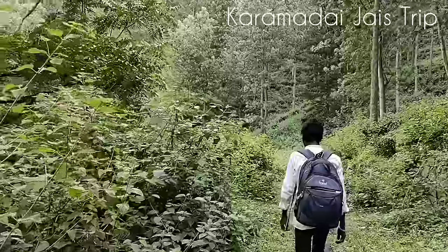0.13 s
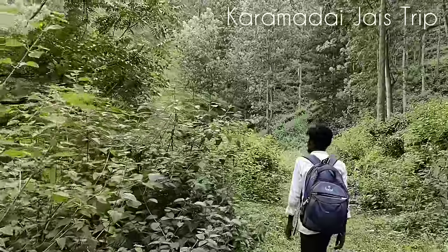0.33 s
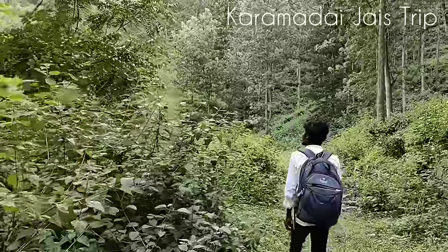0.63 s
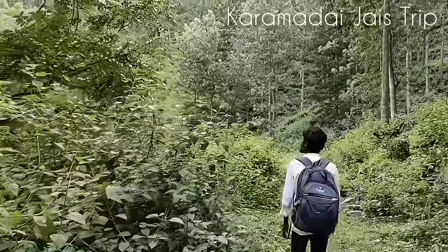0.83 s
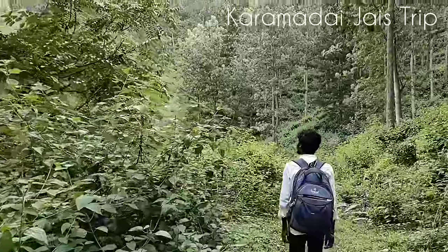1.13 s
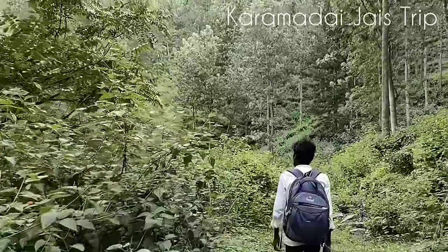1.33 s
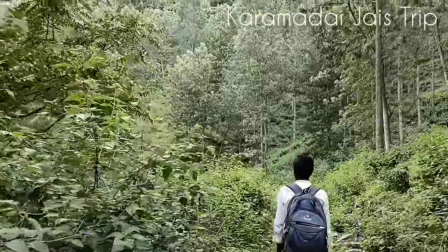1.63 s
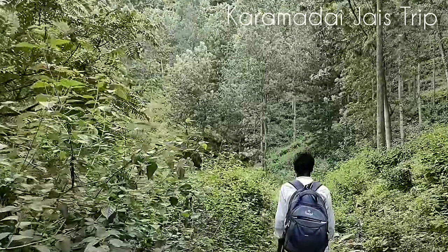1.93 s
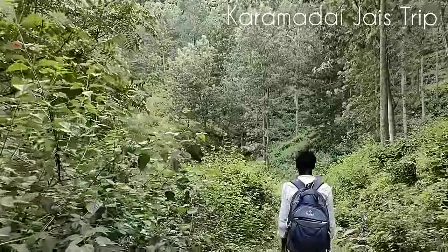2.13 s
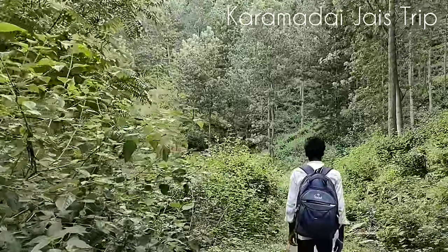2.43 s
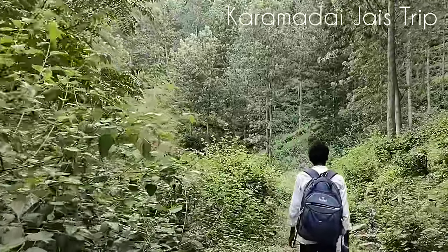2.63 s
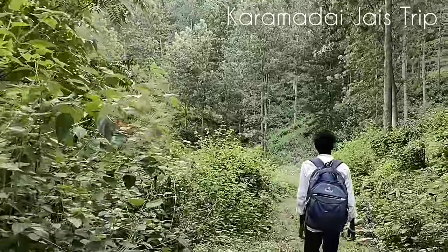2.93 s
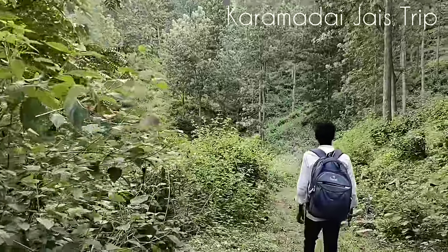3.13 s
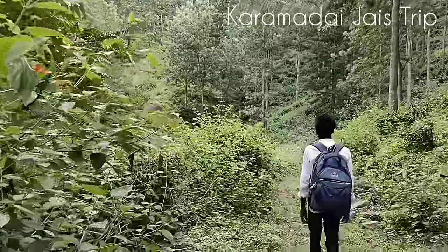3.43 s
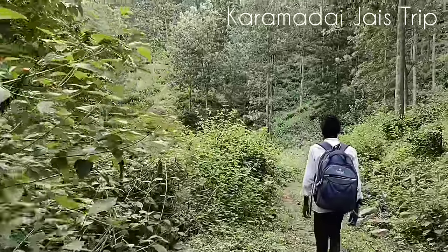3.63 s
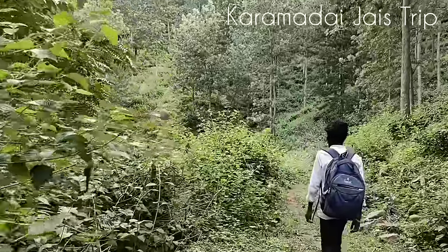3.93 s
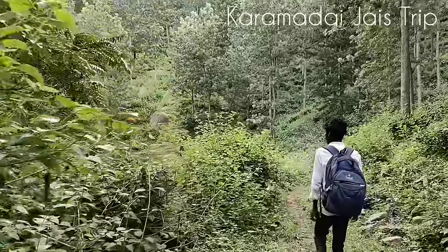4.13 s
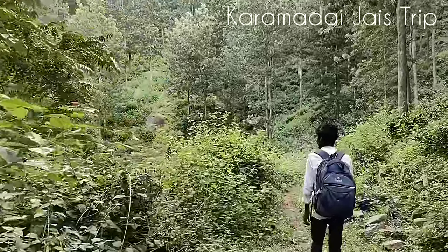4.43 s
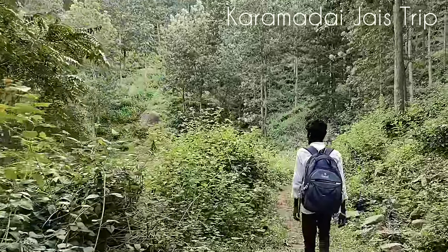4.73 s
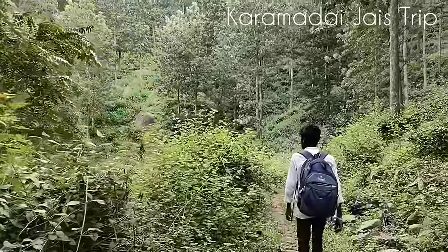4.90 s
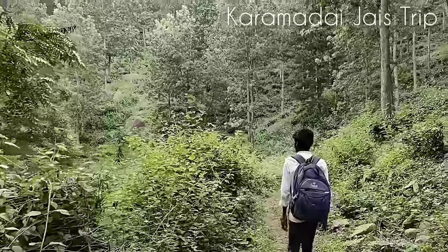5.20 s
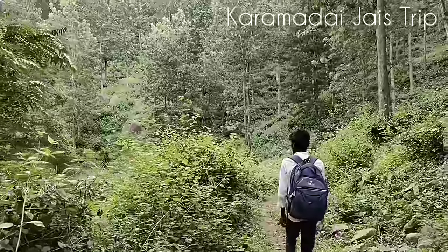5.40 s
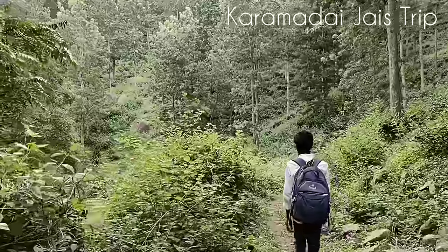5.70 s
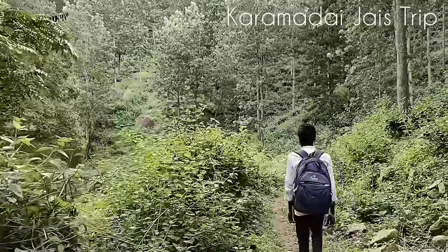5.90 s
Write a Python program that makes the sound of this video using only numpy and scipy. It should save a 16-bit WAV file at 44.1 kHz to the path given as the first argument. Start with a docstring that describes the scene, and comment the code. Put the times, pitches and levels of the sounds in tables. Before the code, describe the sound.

Close, uneven steps crackle over twigs and leaves with dull thuds, while soft wind buffets the microphone and small birds chirp behind.

```python
"""A dirt trail in dense forest, walked with a hand-held microphone.
Each footfall is a twig's sharp pulse and a burst of tiny litter breaks through resonances, over a damped thud.
Low-passed eddies buffet the microphone; birds are gliding, warbling sines with a scattered tail.
An unsteady sine gives an insect's thin tones and one step's ringing; coloured noise makes the far hush.
A narrow-band recorder suppresses weak bands, cuts the treble and adds hiss."""
import sys
import numpy as np
from scipy import signal
from scipy.fft import rfft, irfft
from scipy.io import wavfile
from scipy.ndimage import uniform_filter1d, map_coordinates

SR = 44100
rng = np.random.default_rng(int(sys.argv[2]) if len(sys.argv) > 2 else 0)


def log_audio(samples):
    """Write samples as a 16-bit WAV file to the path given in sys.argv[1]."""
    # one column per channel
    frames = np.atleast_2d(samples).T
    # limit to full scale, then quantise
    limited = np.clip(frames, -1, 1)
    pcm = np.round(limited * 32767).astype(np.int16)
    wavfile.write(sys.argv[1], SR, pcm)


N = 267157
TIME = np.arange(N) / SR

# Bands of knock, wood, twig and crack. Each row: low edge in Hz, high edge in Hz.
REGISTERS = [(160, 900), (1000, 2200), (2250, 3400), (3600, 7200)]
# Footfalls. Each row: start in seconds, own pitch in Hz, snap in dB, crunch in dB,
# crunch length in seconds, brightness in dB, fullness in dB, thud in dB.
FOOTFALLS = [(.754, 1860, -35, -51.5, 0.064, -4.5, 1.5, -60),
             (1.906, 5680, -26.5, -47, 0.047, 0.5, -3.5, -23.5),
             (2.483, 1583, -30.5, -46, 0.063, -0.5, -0.5, -34.5),
             (3.0381, 1526, -24, -49.5, 0.051, -2, 1.5, -15),
             (3.3038, 5250, -44.5, -55.5, 0.025, -1, -9.5, -56.5),
             (3.6284, 3870, -32.5, -59, 0.084, 7, -6, -24.5),
             (4.171, 6120, -30.5, -47, 0.024, 5, -9, -23.5), (4.222, 5640, -36, -51, 0.12, 2.5, -16.5, -26),
             (4.262, 1890, -39.5, -60.5, 0.012, -5.5, -10, -41.5),
             (4.8615, 1210, -43.5, -54, 0.034, -3.5, 2, -46.5),
             (5.309, 3900, -38, -56, 0.092, 0.5, -11.5, -33.5), (6.0186, 5040, -42, -50, .028, 0, -32, -45)]


def from_db(db):
    """Logarithmic level: decibels to amplitude gain."""
    return 10 ** (np.asarray(db) / 20)


def rms_one(x):
    """Normalisation by mean power: scale to rms 1."""
    return x / np.sqrt(np.mean(x ** 2) + 1e-20)


def level(rows):
    """Level envelope, linear in dB: gain at every sample from (seconds, dB) rows."""
    return from_db(np.interp(TIME, *np.transpose(rows)))


def add(out, s, sound):
    """Superposition: mix a sound in at a time in seconds."""
    start = max(round(s * SR), 0)
    out[start:start + len(sound)] += sound[:max(N - start, 0)]


def drift(rate_hz, size):
    """Band-limited fluctuation: random points joined smoothly, rms 1."""
    place = np.arange(size) * rate_hz / SR
    return rms_one(map_coordinates(rng.standard_normal(4096), [place], order=3, mode="wrap"))


def coloured_noise(spectrum):
    """Spectral shaping: white noise weighted by (Hz, dB) rows, rms 1."""
    hz, db = np.transpose(spectrum)
    bins = np.maximum(np.arange(N // 2 + 1) * SR / N, 1)
    gain = from_db(np.interp(np.log(bins), np.log(hz), db, left=-120, right=-120))
    return rms_one(irfft(rfft(rng.standard_normal(N)) * gain, N))


def resonance(x, hz, width_hz):
    """Damped resonator: a conjugate pole pair with gain near 1 at its peak."""
    r = np.exp(-np.pi * width_hz / SR)
    numerator = np.array([1, 0, -1]) * (1 - r * r) / 2
    return signal.lfilter(numerator, [1, -2 * r * np.cos(2 * np.pi * hz / SR), r * r], x)


def swell(s, length, attack_s, t60_s):
    """Envelope: rise to full strength at a time, hold, decay exponentially."""
    rise = np.clip(1 + (TIME - s) / attack_s, 0, 1) ** 2
    return rise * from_db(-60 * np.clip((TIME - s - length) / t60_s, 0, 3))


def forest_hush():
    """Diffuse background: coloured noise for the far forest, let through by the recorder's noise gate."""
    # Level of the hush as the recorder's noise gate opens and closes.
    # Each row: time in seconds, level in dB.
    hush = [(0, -100), (.15, -79), (.9, -76.5), (1.1, -90), (1.35, -79), (2.1, -71.5), (2.9, -70),
            (3.4, -83), (4.8, -78), (5.05, -100), (5.28, -100), (5.36, -70), (6.06, -70)]
    # Its spectrum. Each row: frequency in Hz, relative density in dB per Hz.
    hush_colour = [(200, -9), (500, -2.5), (1200, -0.5), (2200, -5.5), (3200, -1.5), (5500, -6),
                   (7200, -11.5)]
    return level(hush) * coloured_noise(hush_colour)


def air_strength():
    """Addition of powers: short puffs join a flow that comes and goes."""
    # Rising and dropping flow over the microphone. Each row: time in seconds, level in dB.
    flow = [(0, -84), (.1, -88), (.15, -37.5), (.6, -61.5), (.85, -57), (1.22, -86), (1.38, -35),
            (1.66, -59), (2.1, -35.5), (2.75, -29), (3.3, -42.5), (3.41, -81), (3.66, -31), (3.97, -82),
            (4.6, -73), (5.28, -89.5), (5.36, -62.5), (6.06, -64)]
    # Puffs. Each row: time of full strength in seconds, hold in seconds, level in dB.
    gusts = [(0.159, 0.015, -30.5), (0.23, 0.031, -34.5), (0.441, 0.0057, -30), (1.473, 0.018, -20.5),
             (1.751, 0.0059, -27.5), (1.828, 0.0063, -28), (2.089, .006, -24), (2.178, 0.037, -25.5),
             (2.267, 0.028, -21), (2.475, 0.084, -18.5), (2.692, 0.045, -15), (2.808, 0.092, -19.5),
             (3.031, 0.026, -28.5), (3.698, 0.035, -30), (5.447, 0.0055, -41.5), (5.784, 0.0076, -48.5),
             (5.874, 0.0064, -49.5), (5.952, 0.02, -44)]
    attack_s, t60_s = 0.039, .18
    puffs = sum((from_db(db) * swell(s, length, attack_s, t60_s)) ** 2 for s, length, db in gusts)
    return np.sqrt(level(flow) ** 2 + puffs)


def buffeting(calm_hz, gale_hz):
    """Turbulence at the port: stronger air carries the eddies to higher frequencies."""
    # Eddies before the low-pass. Each row: frequency in Hz, relative density in dB per Hz.
    buffet_colour = [(12, -11), (22, 3.5), (32, 7.5), (52, 2.5), (85, 1), (160, -14), (260, -24.5),
                     (420, -34)]
    eddies = coloured_noise(buffet_colour)
    strength = air_strength()
    # position among four cutoffs, from light air (0) to a gale (3)
    gust = np.interp(20 * np.log10(strength), [-55, -14], [0, 3])
    air = 0
    for k, hz in enumerate(np.geomspace(calm_hz, gale_hz, num=4)):
        softened = signal.sosfilt(signal.butter(5, hz, fs=SR, output="sos"), eddies)
        air = air + np.maximum(1 - abs(gust - k), 0) * softened
    # the air strength alone sets the level, so the eddies are evened out
    power = uniform_filter1d(uniform_filter1d(air ** 2, size=1400), size=900)
    return strength * air / np.sqrt(power + 1e-9)


def bird_notes():
    """Glides and an echo: yields (start s, length s, three pitches Hz, dB, warble %) of each note."""
    # Rough chirps. Each row: start in seconds, length in seconds, start pitch in Hz, glide in %, level in dB.
    chirps = [(.084, 0.025, 4290, -11, -52), (.196, 0.048, 3480, -6.5, -54), (1.51, 0.24, 6690, -3.5, -67),
              (1.618, 0.043, 6160, -30.5, -44), (1.656, 0.092, 5345, -11, -56),
              (1.758, 0.053, 6014, -8.5, -37.5), (1.816, 0.029, 4383, -6.5, -44.5),
              (3.53, 0.041, 3092, 1, -66), (3.575, 0.065, 3888, -1.5, -50.5),
              (3.876, 0.022, 2965, -10.5, -47), (4.029, 0.066, 3527, -4.5, -53.5),
              (4.066, 0.0084, 1343, 4.5, -43.5), (4.118, 0.014, 6850, -14.5, -45),
              (4.384, 0.057, 6030, -7.5, -43.5), (4.385, 0.057, 2526, -8.5, -63),
              (4.439, 0.016, 4156, -2, -50), (4.524, 0.1, 3792, -5.5, -49.5),
              (4.652, 0.031, 3653, -3, -43.5), (4.715, 0.062, 3630, -2, -54.5), (5.594, 0.1, 4036, 6, -54),
              (5.623, 0.052, 3028, -2.5, -48), (5.685, 0.063, 3010, -3.5, -52.5),
              (5.736, 0.084, 4196, 1, -55), (5.752, 0.12, 2581, -11, -58.5)]
    # Soft, low hoots. Each row: start in seconds, length in seconds, start pitch in Hz, glide in %, level in dB.
    hoots = [(.21, 0.085, 915, -7.5, -60), (.374, 0.035, 873, -8.5, -48), (.473, 0.038, 871, 9.5, -47.5),
             (.66, 0.019, 1445, -2, -52), (5.41, .06, 927.5, 0, -60.5), (5.532, 0.14, 911, 2, -62)]
    # Clear whistles. Each row: start in seconds, length in seconds, reference pitch in Hz, level in dB.
    whistles = [(2.778, 0.11, 2821, -37), (4.696, 0.066, 2916, -40.5)]
    # Pitch at start, middle and end, as shares of the reference pitch.
    whistle_rise = np.array([0.96, .99, 0.97])
    chirp_warble, hoot_warble, whistle_warble = 2.8, 0.24, 0.94  # rms, %
    glide_shares = np.array([0, 0.54, 1])  # share of the glide done at start, middle and end
    for calls, warble in ((chirps, chirp_warble), (hoots, hoot_warble)):
        for s, length, hz, glide, db in calls:
            yield s, length, hz * (1 + glide / 100 * glide_shares), db, warble
    # a softer, rough upbeat leads into each whistle
    lead_s, lead_db, lead_rise = .06, -13, np.array([.835, .84, .91])
    echo_s, echo_db = 0.18, -34  # the hillside returns each whistle
    for s, length, hz, db in whistles:
        yield s - lead_s, lead_s, hz * lead_rise, db + lead_db, chirp_warble
        yield s, length, hz * whistle_rise, db, whistle_warble
        yield s + echo_s, length, hz * whistle_rise, db + echo_db, whistle_warble


def forest_scatter(x, size=13230):
    """Multiple scattering: trunks and leaves spread a sound into a short, diffuse tail."""
    t60_s, build_up_s = .22, 0.0051
    t = np.arange(size) / SR
    tail = rng.standard_normal(size) * from_db(-60 * t / t60_s) * np.minimum(t / build_up_s, 1)
    return signal.fftconvolve(x, tail / np.sqrt(np.sum(tail ** 2)))[:N]


def birds(direct_db, scattered_db, warble_hz, release_s, flutter_db):
    """Frequency modulation: sines start crisply, glide through three pitches with a quick warble and fade."""
    attack_s = 0.012
    out = np.zeros(N)
    for s, length, pitches, db, warble in bird_notes():
        t = np.arange(int((length + release_s / 2) * SR)) / SR
        hz = np.interp(t, [0, length / 2, length], pitches)
        hz = hz * (1 + warble / 100 * drift(warble_hz, len(t)))
        ramp = np.clip(np.minimum(t / attack_s, (t[-1] - t) / release_s), 0, 1)
        gain = np.sin(np.pi / 2 * ramp) ** 2 * from_db(db + flutter_db * drift(43, len(t)))
        tone = np.sqrt(2) * np.sin(2 * np.pi * np.cumsum(hz) / SR)
        add(out, s - attack_s / 2, gain * tone)
    return from_db(direct_db) * out + from_db(scattered_db) * forest_scatter(out)


def insect_and_ringing(flutter_db=2.0):
    """Amplitude modulation: one unsteady sine serves a distant insect and the ringing of a step."""
    # Thin tones near 4310 Hz: the insect, and at 2.488 the ringing of a step.
    # Each row: time of full strength in seconds, length before the release in seconds,
    # level in dB, fade over that length in dB (negative grows).
    thin_tones = [(0.132, 0.44, -67, 5), (.81, 0.092, -63, 11.5), (1.332, 1, -77.5, -4.5),
                  (2.488, 0.37, -57.5, 12.5), (5.37, 0.81, -72.5, -7)]
    attack_s, t60_s = .04, 0.058
    hz = 4310 + 7 * drift(90, N)
    strength = 0
    for s, length, db, fade_db in thin_tones:
        fade = from_db(db - fade_db * np.clip((TIME - s) / length, 0, 1))
        strength = strength + swell(s, length, attack_s, t60_s) * fade
    tone = np.sqrt(2) * np.sin(2 * np.pi * np.cumsum(hz) / SR)
    return strength * from_db(flutter_db * drift(57, N)) * tone


def trail_ring(register, own_hz, detune, own_db, own_q=7.0, size=2048):
    """Modal response of one register to a single break, unit energy; the broken piece adds its own pitch."""
    # Modes of the trail. Each row: frequency in Hz, width in Hz, relative level in dB.
    trail_modes = [(181.5, 40, -3), (343, 60, 2.5), (495, 82, 5.5), (637, 270, -1.5), (1194, 82, 7),
                   (1650, 200, -2), (1910, 250, -0.5), (2336, 66, -0.5), (2550, 2000, -1), (4130, 1000, 4),
                   (5950, 790, 0.5), (6490, 600, -4)]
    low, high = register
    click, out = signal.unit_impulse(size), np.zeros(size)
    for k, (hz, width_hz, db) in enumerate(trail_modes):
        shift, strength = rng.standard_normal(2)
        if low < hz < high:
            mode = resonance(click, hz * (1 + detune * shift), width_hz)
            out += (-1) ** k * from_db(db + 2.2 * strength) * mode
    if low < own_hz < high:
        out = out + from_db(own_db) * resonance(out, own_hz, own_hz / own_q)
    out = signal.sosfilt(signal.butter(3, register, "band", fs=SR, output="sos"), out)
    return out / np.sqrt(np.sum(out ** 2) + 1e-20)


def step_levels(brightness, fullness):
    """Spectral balance in dB per register: brightness tilts; fullness raises or lowers the middle."""
    # Make-up in knock, wood, twig and crack. Each row: snap in dB, crunch in dB,
    # share of brightness, share of fullness.
    step_colour = [(-1.5, -1.5, 0.23, 0), (-4, 2, 0.96, 0.71), (-16, -7.5, .3, 1), (-4.5, 1, 0.9, 0.028)]
    snap, crunch, bright_share, full_share = np.transpose(step_colour)
    colour = brightness * bright_share + fullness * full_share
    return snap + colour, crunch + colour


def litter():
    """Band excitation: yields (start s, length s, own Hz, dB per register, brushed) of each crush."""
    # Soil scuffed (low) or leaves brushed (high).
    # Each row: start in seconds, length in seconds, own pitch in Hz, level in dB.
    brushes = [(0.429, 0.026, 547, -54.5), (.76, 0.052, 1750, -48), (.762, 0.044, 586, -44.5),
               (0.878, 0.024, 532, -60), (1.255, 0.017, 2690, -47.5), (1.253, 0.13, 1445, -60),
               (1.292, 0.073, 2960, -53.5), (1.343, 0.018, 2054, -51.5), (1.368, 0.074, 1994, -64),
               (1.35, 0.039, 3710, -62), (2.371, 0.019, 2730, -60.5), (2.389, 0.099, 1575, -66),
               (3.689, 0.069, 480, -52), (4.235, 0.007, 400, -59), (4.254, 0.0073, 587, -48),
               (4.282, 0.068, 337, -63.5), (4.763, .02, 1550, -54.5), (5.36, 0.0096, 428, -42.5),
               (5.372, 0.0087, 514, -57.5), (5.387, 0.13, 324, -56), (5.379, 0.11, 6150, -60.5),
               (5.763, 0.052, 2900, -46.5), (5.961, 0.028, 4900, -46.5)]
    fall_db_per_octave = 25.5  # away from a brush's own pitch
    for s, hz, _, db, length, brightness, fullness, _ in FOOTFALLS:
        yield s, length, hz, db + step_levels(brightness, fullness)[1], False
    for s, length, hz, db in brushes:
        octaves = abs(np.log2(np.sqrt(np.prod(REGISTERS, axis=1)) / hz))
        yield s, length, hz, db - fall_db_per_octave * (octaves - octaves.min()), True


def crunches(grains_per_s, spread_db, tail_t60_s, step_ring_db, brush_ring_db, clump_db=-1.0, size=11025):
    """Granular fracture: leaves and grit give way in uneven clumps of tiny breaks, then settle."""
    typical_crush_s, settle_growth = 0.061, 0.52  # a longer crush takes longer to settle
    press_share, hold_share = 0.17, 0.41  # shares of a crush before full pressure and before decay
    out, t = np.zeros(N), np.arange(size) / SR
    for s, length, own_hz, levels, brushed in litter():
        settle_t60_s = tail_t60_s * (length / typical_crush_s) ** settle_growth
        press = np.minimum(t / (press_share * length), 1)
        pressure = press * from_db(-60 * np.maximum(t - hold_share * length, 0) / settle_t60_s)
        grain_db = spread_db * np.minimum(rng.exponential(1, size), 4) + clump_db * drift(160, size)
        breaks = rng.choice([-1, 1], size) * (rng.random(size) < grains_per_s / SR)
        grains = pressure * rms_one(from_db(grain_db) * breaks)
        own_db = brush_ring_db if brushed else step_ring_db
        for register, db in zip(REGISTERS, levels):
            ring = trail_ring(register, own_hz, detune=0.041, own_db=own_db)
            add(out, s, from_db(db) * signal.fftconvolve(grains, ring))
    return out


def thuds(soft_hz, size=8820):
    """Damped oscillation: each footfall or jolt sets off a low swing."""
    # Bumps against the microphone. Each row: start in seconds, level in dB, pitch in Hz, t60 in seconds.
    jolts = [(.686, -21.5, 161.5, .018), (.689, -16, 44.6, .05), (2.686, -27, 140, .07),
             (2.737, -19, 168.7, .08)]
    # steps with a stronger snap swing lower; this pitch belongs to this snap level
    thud_hz, at_snap_db, db_per_octave, thud_t60_s = 108, -34.5, 21.5, 0.084
    swings = []
    for s, _, snap_db, *_, db in FOOTFALLS:
        hz = thud_hz * 2 ** ((at_snap_db - snap_db) / db_per_octave)
        swings.append((s, db, hz, thud_t60_s))
    out, t = np.zeros(N), np.arange(size) / SR
    for s, db, hz, t60 in swings + list(jolts):
        add(out, s, from_db(db - 60 * t / t60) * np.sin(2 * np.pi * hz * t))
    return signal.sosfilt(signal.butter(4, soft_hz, fs=SR, output="sos"), out + 1e-18)


def snaps(splinter_db, splinter_s, size=441):
    """Impulsive excitation: a twig breaks in one sharp pulse, its last fibres tear just after."""
    out, t = np.zeros(N), np.arange(size) / SR
    for s, own_hz, snap_db, _, _, brightness, fullness, _ in FOOTFALLS:
        force = from_db(splinter_db) * rng.standard_normal(size) * np.exp(-t / splinter_s)
        force[0] = np.sqrt(size)  # the sharp pulse
        levels = snap_db + step_levels(brightness, fullness)[0]
        for register, db in zip(REGISTERS, levels):
            ring = trail_ring(register, own_hz, detune=.012, own_db=7.5)
            add(out, s - .0004, from_db(db) * np.convolve(force, ring))
    return out


def scene():
    """Superposition of steps close by, air on the microphone and the forest behind."""
    rumble = buffeting(calm_hz=72.6, gale_hz=186) + thuds(soft_hz=326)
    tones = insect_and_ringing() + birds(direct_db=-3.0, scattered_db=-4.0, warble_hz=605.8,
                                         release_s=0.035, flutter_db=2.5)
    steps = snaps(splinter_db=3.0, splinter_s=0.0026)
    steps += crunches(grains_per_s=1400, spread_db=0.47, tail_t60_s=0.15, step_ring_db=6, brush_ring_db=20.5)
    return (forest_hush() + rumble + tones + steps)[None]


def suppress_noise(x, threshold_db, depth_db, size=512):
    """Downward expansion: weak bands are pushed down, which shortens tails and thins the gaps."""
    overlap = size * 3 // 4
    spectra = signal.stft(x, nperseg=size, noverlap=overlap)[2]
    # smoothed over neighbouring frequencies, then over neighbouring frames
    power = uniform_filter1d(uniform_filter1d(abs(spectra) ** 2, size=3, axis=0), size=3, axis=1)
    excess = (power / from_db(threshold_db) ** 2) ** 2
    gain = from_db(depth_db / (1 + excess))
    return signal.istft(spectra * gain, nperseg=size, noverlap=overlap)[1][:N]


def record(dry):
    """Band limitation: a recorder suppresses noise, cuts the top steeply and adds a faint hiss."""
    cutoff_hz, hiss_top_hz = 7200, 15700
    cleaned = suppress_noise(dry[0], threshold_db=-76.0, depth_db=-13.5)
    narrow = signal.sosfilt(signal.ellip(8, .3, 62, cutoff_hz, fs=SR, output="sos"), cleaned)
    hiss = from_db(-95) * rng.standard_normal(N)
    return signal.sosfilt(signal.ellip(8, .3, 70, hiss_top_hz, fs=SR, output="sos"), narrow + hiss)[None]


dry = scene()
out = record(dry)
log_audio(out)
```